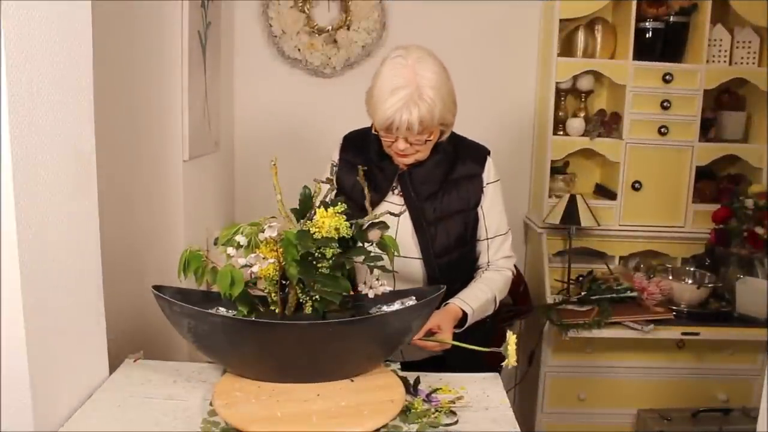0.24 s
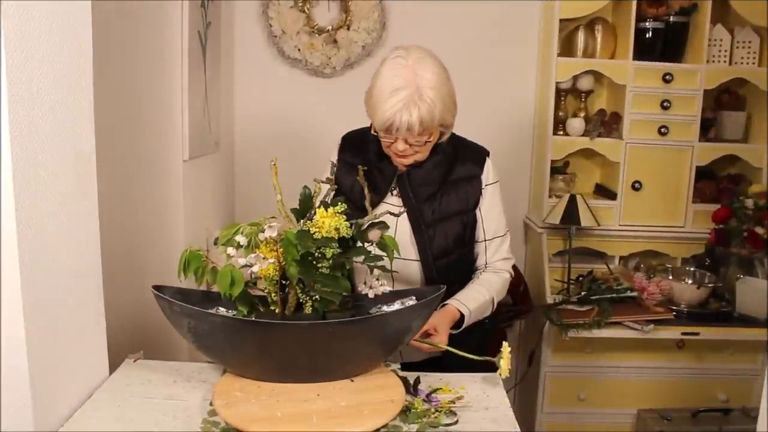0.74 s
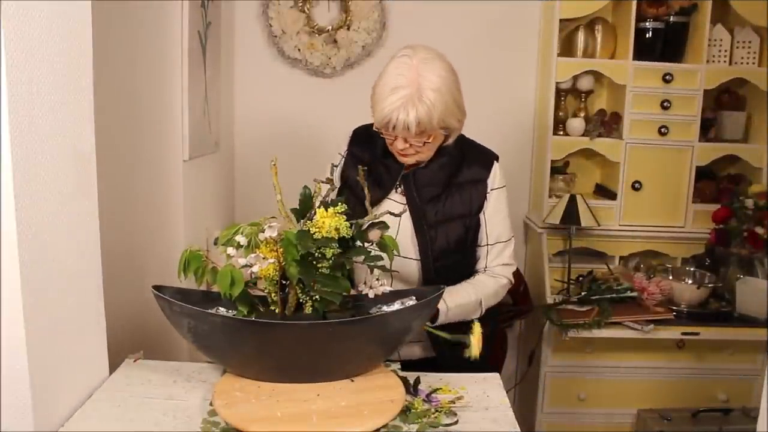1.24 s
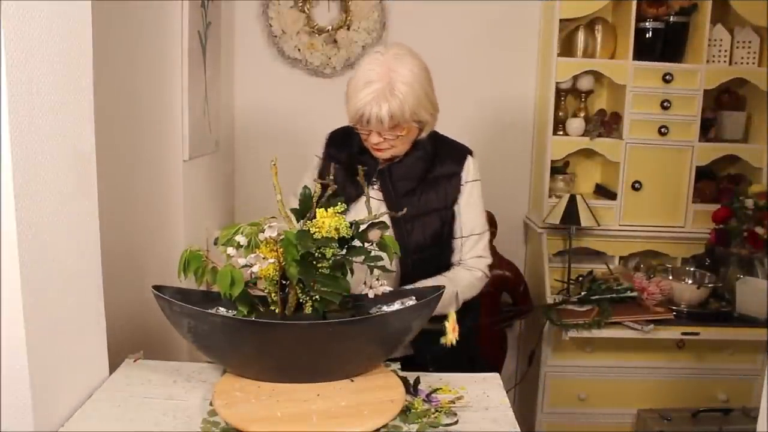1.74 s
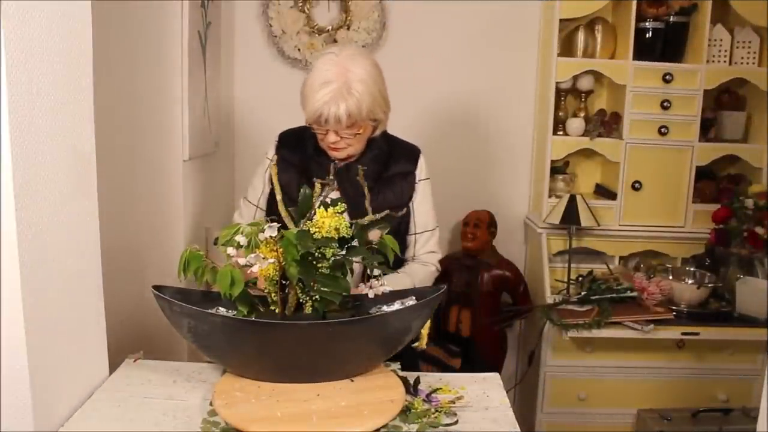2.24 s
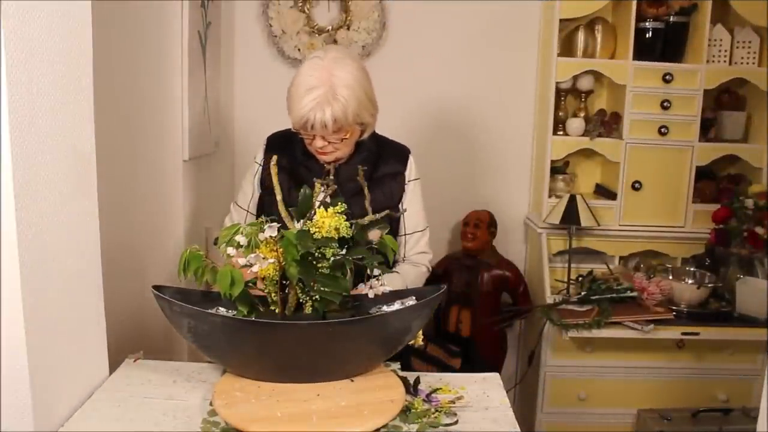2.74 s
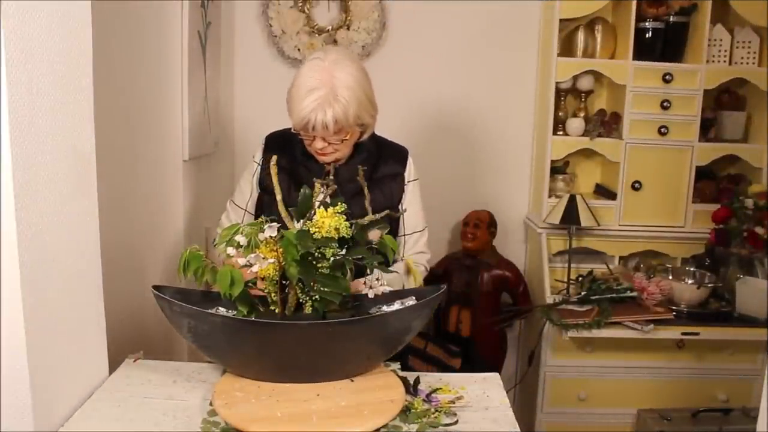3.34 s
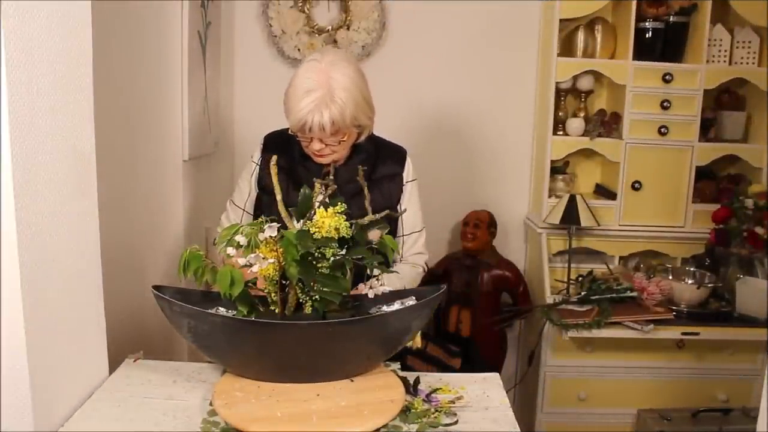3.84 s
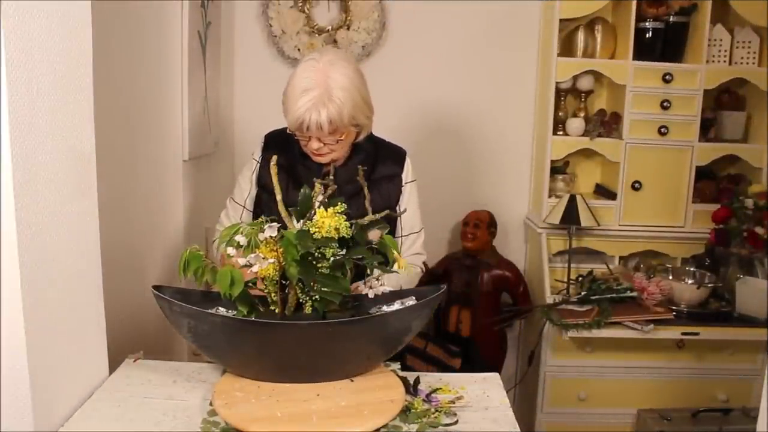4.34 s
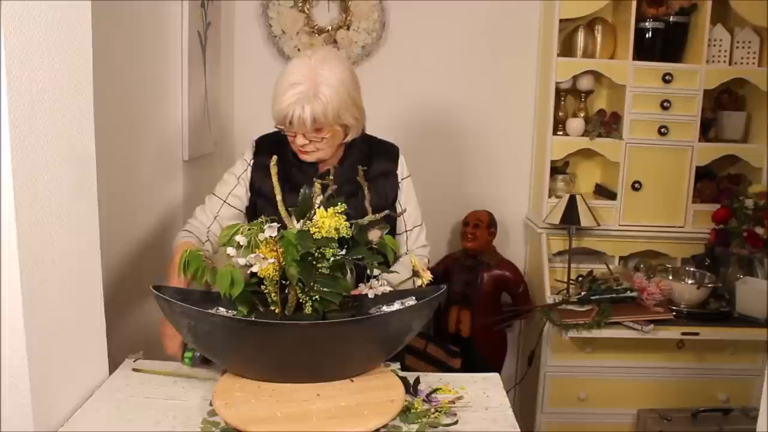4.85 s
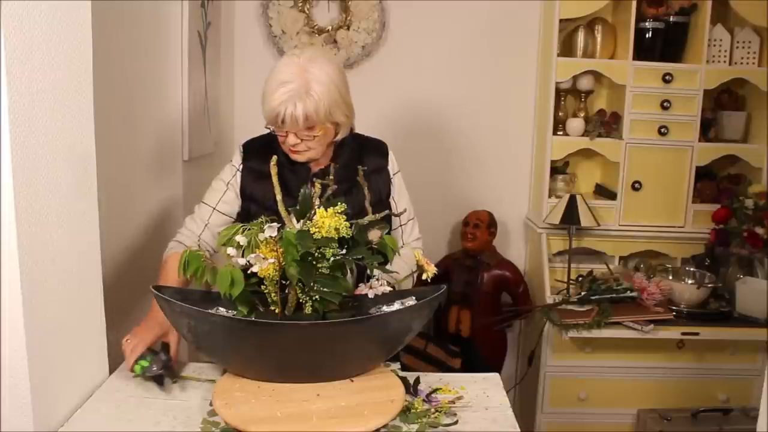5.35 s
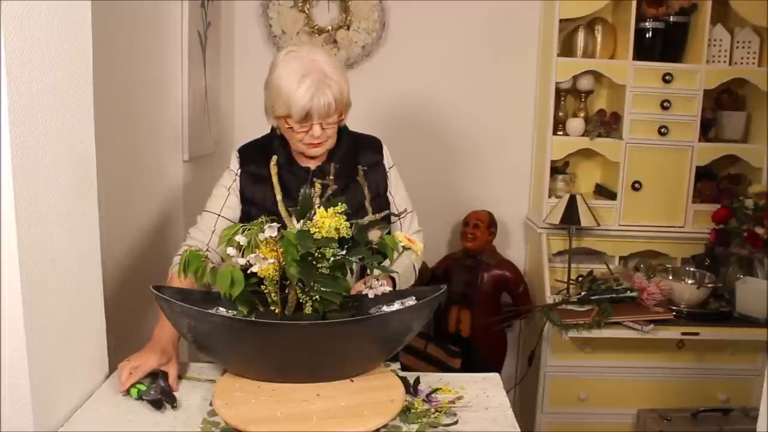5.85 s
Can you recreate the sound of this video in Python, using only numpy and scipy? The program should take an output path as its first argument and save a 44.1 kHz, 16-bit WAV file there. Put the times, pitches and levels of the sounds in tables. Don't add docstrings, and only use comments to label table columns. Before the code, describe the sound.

Secateurs snip two stems in a small room, leaves tick and rustle, then the tool knocks, bounces and lands hard on a wooden table.

```python
import sys
import numpy as np
from scipy import signal
from scipy.fft import rfft, irfft
from scipy.io import wavfile

SR = 44100
rng = np.random.default_rng(int(sys.argv[2]) if len(sys.argv) > 2 else 0)


def voltage_ratio(level):
    return 10 ** (np.asarray(level, float) / 20)


def digitize_waveform(pressure):
    field = np.atleast_2d(pressure).T
    bounded = np.clip(field, -1, 1)
    quanta = np.round(bounded * 32767).astype(np.int16)
    wavfile.write(sys.argv[1], SR, quanta)


N = 268128


def rms_one(x):
    return x / np.sqrt(np.mean(x ** 2) + 1e-20)


def at_hz(points, hz):
    table_hz, value = np.transpose(points)
    return np.interp(np.log(np.maximum(hz, 1)), np.log(table_hz), value)


def convolve(x, response):
    return signal.fftconvolve(x, response)[:len(x)]


def causal(shape_db, size=16384):
    hz = np.arange(size // 2 + 1) * SR / size
    cepstrum = irfft(shape_db(hz) * np.log(10) / 20)
    cepstrum[1:size // 2] *= 2
    cepstrum[size // 2 + 1:] = 0
    return irfft(np.exp(rfft(cepstrum)))[:size // 2]


def tinted(x, points):
    return convolve(x, causal(lambda hz: at_hz(points, hz)))


def burst(length_ms):
    size = 2048
    chance = rng.standard_normal(size)[::16] ** 2
    delay_s = length_ms / 1000 * np.repeat(chance, 16)[:size // 2 + 1]
    phase = -2 * np.pi * np.cumsum(delay_s) * SR / size
    return irfft(np.exp(1j * phase))[:size // 2]


def add(out, s, db, sound):
    at = round(s * SR)
    out[at:at + len(sound)] += (voltage_ratio(db) * sound / np.max(np.abs(sound)))[:N - at]


def modes(body, size=16384):
    t = np.arange(size) / SR
    return sum(voltage_ratio(db - 60 * t / t60) * np.sin(2 * np.pi * hz * t) for hz, db, t60 in body)


def snips():
    # start_s, level_db (peak), length_ms
    thick_cut = [
        (2.1206, -16, 1.0),
        (2.1281, -18, 1.0),
    ]
    thin_cut = [
        (4.2167, -24, 1.0),
        (4.2178, -17, 1.6),
        (4.2204, -18, 1.6),
        (4.2252, -23, 2.0),
    ]
    # pitch_hz, level_db (per Hz)
    thick_stem = [(180, -57), (300, -27), (366, -36), (418, -11), (502, 1), (656, -27), (762, -9),
                  (1190, -14), (2280, -2.5), (3030, 1), (3350, -7), (4750, -3), (16000, -37)]
    thin_stem = [(180, -54), (300, -19), (678, -14.5), (1170, -9), (1460, -7.5), (2000, -9), (2280, 0.5),
                 (2930, -3.5), (3700, -2.5), (5900, -4.5), (8220, -5.5), (13300, -8.5), (16000, -6)]
    # pitch_hz, level_db, t60_s
    blades = [(2310, -30, 0.15), (2380, -28, .16), (2470, -38, 0.15), (2540, -28, 0.13), (3090, -37, 0.023),
              (4700, -48, 0.045), (10500, -33, 0.007)]
    out = np.zeros(N)
    for cuts, stem in ((thick_cut, thick_stem), (thin_cut, thin_stem)):
        for s, db, length_ms in cuts:
            spray = np.pad(burst(length_ms), (0, 8192))
            crack = tinted(spray, stem)
            ring = convolve(spray, modes(blades))
            add(out, s, db, crack / np.max(np.abs(crack)) + ring)
    return out


def ticks(events, length_ms, shelf_db, per_octave_db=0):
    out = np.zeros(N)
    for s, db, centre_hz, octaves in events:
        def hump(hz):
            away = np.log2((hz + 1) / centre_hz)
            shelf = shelf_db + per_octave_db * octaves + 3.6 * np.minimum(away, 0)
            return np.maximum(-6 * (away / max(octaves, 0.1)) ** 2, shelf)
        colour = np.pad(causal(hump, size=2048), (0, 512))
        add(out, s, db - 0.5, convolve(colour, burst(length_ms)))
    return out


def catch():
    # start_s, level_db (peak), pitch_hz (centre), width_octaves
    clicks = [
        (0.369, -25, 5160, 0.28),
        (0.389, -25, 5370, 0.5),
        (4.7747, -37, 4570, 0.71),
        (4.7774, -21.5, 6150, 0.69),
        (4.7795, -24.5, 4800, 0.95),
        (5.929, -29, 11100, 0.93),
        (5.9302, -31, 4630, 0.59),
    ]
    return ticks(clicks, length_ms=1, shelf_db=-12.5, per_octave_db=3.4)


def handle():
    # start_s, level_db (peak), pitch_hz (centre), width_octaves
    strikes = [
        (4.9136, -19.5, 2630, 0.9),
        (5.0133, -28.5, 4800, 0.26),
        (6.0519, -26, 2560, 0.16),
        (6.0584, -38.5, 2410, 0.22),
    ]
    return ticks(strikes, length_ms=1.3, shelf_db=-36)


def plant_ticks():
    # start_s, level_db (peak), pitch_hz (centre), width_octaves
    crisp = [(0.2114, -29, 5700, 1), (0.2894, -42, 10200, 0.73), (0.3024, -53, 4990, 0.93),
             (0.3144, -37, 5200, 1), (0.3633, -27.5, 5400, 1), (0.3914, -44, 5000, 0.88),
             (0.3992, -29.5, 7500, 0.22), (0.6564, -31, 3900, 1), (1.0565, -39.5, 3260, 1),
             (1.3108, -33.5, 7060, 0.44), (1.374, -32.5, 5760, 0.36), (1.6232, -37.5, 4360, 0.27),
             (1.701, -34.5, 4060, 0.85), (2.4541, -34, 5300, 0.95), (2.6303, -36.5, 4620, 0.35),
             (2.9656, -41, 3900, 0.65), (4.6356, -35.5, 5070, 0.8), (4.7712, -32, 2220, 0.56)]
    return ticks(crisp, length_ms=0.58, shelf_db=-18.5, per_octave_db=8.6)


def brush():
    start_s, gap_s, level_db, swell_db = 3.893, 0.011, -33, 5
    ribs = [(start_s + gap_s * k, level_db - swell_db * (k - 2) ** 2, 10500, 0.7) for k in range(5)]
    return ticks(ribs, length_ms=4.5, shelf_db=-1)


def taps():
    # start_s, level_db (peak), pitch_hz (centre)
    dull = [(0.21, -47.5, 720), (0.369, -46, 720), (0.661, -47, 450), (2.028, -43, 367),
            (2.123, -36.5, 567), (2.416, -34, 1040), (2.454, -44.5, 352), (2.63, -37.5, 650),
            (2.968, -49.5, 880), (4.771, -35, 920), (5.016, -19.5, 694), (5.161, -61, 736),
            (5.859, -44.5, 1720), (5.731, -38.5, 613)]
    # start_s, level_db (peak)
    heel = [
        (2.419, -37.5),
        (5.044, -29),
        (5.759, -43.5),
        (5.849, -47),
        (6.052, -12.5),
    ]
    tap_octaves, hand_hz, hand_octaves = 0.65, 354, 0.34
    knuckles = ticks([(*row, tap_octaves) for row in dull], length_ms=1.6, shelf_db=-40)
    flesh = ticks([(*row, hand_hz, hand_octaves) for row in heel], length_ms=1.5, shelf_db=-61)
    return knuckles + flesh


def table(damping):
    mode_hz = [220, 301, 424, 500, 572, 632, 719, 782, 850, 963, 1063, 1355, 1658, 1943, 2480, 3100]
    # level_db, t60_s
    mode_ring = [(-20, .06), (-3, .2), (-10, .07), (-10, .06), (-7, .08), (-7, .09), (-6, .08), (2, .2),
                 (-6, .1), (-9, .08), (-5, .15), (-16, .08), (-20, .07), (-23, .06), (-24, .04), (-30, .03)]
    return [(hz, db, damping * t60) for hz, (db, t60) in zip(mode_hz, mode_ring)]


def blows(events, body):
    landing_db = 1.5
    out = np.zeros(N)
    sprays = [burst(length_ms) for *_, length_ms in events]
    shares = landing_db * rng.standard_normal((len(events), len(body)))
    for (s, db, tilt_db, _), spray, share in zip(events, sprays, shares):
        tilt = np.clip(tilt_db, -8, 4)
        struck = [(hz, level + tilt * np.log2(hz / 600) + change, t60)
                  for (hz, level, t60), change in zip(body, share)]
        add(out, s, db - 4.5, convolve(modes(struck), spray))
    return out


def knocks():
    # start_s, level_db (peak), tilt_db (per octave)
    single = [
        (2.416, -37, 4),
        (4.771, -40, -11),
        (4.875, -33, -11),
        (4.915, -7.5, 4),
        (4.935, -12.5, 0),
        (4.999, -19, -8),
        (5.162, -36.5, -1),
    ]
    # start_s, level_db (peak), tilt_db (per octave)
    edge_blows = [
        (5.7315, -31, -4),
        (5.999, -34, -4),
        (6.0512, 0, -3),
        (6.06, -5, -2),
        (6.067, -8, 0),
    ]
    # pitch_hz, level_db
    near_edge = [(220, -14), (301, 7), (424, 8.5), (500, -13), (632, 7.5), (782, 1), (1063, -3), (1658, 4)]
    # low and high limits, pitch_hz
    band_hz = [270, 3400]
    knock_ms = 1.25

    bounce_s, bounce_gap_s, bounce_db, bounce_loss_db = 5.0155, 0.0295, -14.5, 6.5
    bounces = [(bounce_s + bounce_gap_s * k, bounce_db - bounce_loss_db * k, -1) for k in range(5)]

    drag_s, drag_gap_s, drag_db, drag_spread_db = 5.76, 0.019, -44, -1.5
    drag = [(drag_s + drag_gap_s * (k + 0.156 * late), drag_db + drag_spread_db * hard, 2)
            for k, (late, hard) in enumerate(rng.standard_normal((10, 2)))]

    edge = [(hz, db + at_hz(near_edge, hz), t60) for hz, db, t60 in table(1)]
    middle_hits = blows([(*row, knock_ms) for row in single + bounces], table(0.8))
    edge_hits = blows([(*row, knock_ms) for row in edge_blows + drag], edge)
    radiates = signal.butter(3, band_hz, "band", fs=SR, output="sos")
    return signal.sosfilt(radiates, middle_hits + edge_hits)


def thump():
    # start_s, level_db (peak), tilt_db (per octave), length_ms
    steps = [
        (1.623, -22, 0.5, 2.79),
        (1.655, -26, -10, 2.4),
    ]
    # pitch_hz, level_db, t60_s
    boards = [(71, 25.5, 0.072), (120, 6, 0.074), (172, -1, 0.11), (215, 20, 0.041), (295, 1, 0.064),
              (387, -2, 0.061), (510, 11.5, 0.038), (700, -13, .06)]
    return blows(steps, boards)


def grains(per_s, spread_db):
    chance, size, side = rng.random((3, N))
    level = voltage_ratio(-spread_db * np.log(size + 0.012))
    return rms_one((chance < per_s / SR) * level * np.sign(side - 0.5))


def strokes(rows):
    rise_db_per_s, fall_db_per_s = 93, 116
    t = np.arange(N) / SR
    levels = [db - rise_db_per_s * np.maximum(s - t, 0) - fall_db_per_s * np.maximum(t - s - hold, 0)
              for s, hold, db in rows]
    return np.max(levels, axis=0)


def handling():
    # start_s, hold_s, level_db
    swishes = [(0.0, .1, -54.5), (.34, .06, -46), (1.15, .4, -48), (1.9, .5, -48.5), (3.8, .12, -58.5),
               (4.6, .26, -49), (5.0, .02, -37.5), (5.5, .4, -51)]
    crackles = [(.3, .1, -45), (1.02, 0.15, -52.5), (1.52, 0.035, -48), (2.28, 0.036, -48),
                (3.5, 0.41, -61), (4.8, .06, -53), (5.2, .1, -63)]
    slides = [(0.0, 0.23, -61.5), (1.0, .95, -57.5), (2.6, 0.092, -49), (3.5, .65, -61.5),
              (4.82, 0.029, -50), (5.18, .6, -57), (5.9, 0.015, -42)]
    # pitch_hz, level_db (per Hz)
    cloth_colour = [(150, -40.5), (400, -17.5), (1200, -2.5), (2500, -4), (5000, -11.5), (10000, -23.5),
                    (16000, -24)]
    leaf_colour = [(500, -5), (2000, -50), (5000, 5), (8000, 2.5), (12000, -1.5), (16000, -5)]
    cloth = rms_one(tinted(grains(6000, spread_db=8.0), cloth_colour))
    leaves = rms_one(tinted(grains(1500, spread_db=7.5), leaf_colour))
    stutter = rms_one(convolve(grains(400, spread_db=6.0), modes(table(0.075))))
    return (voltage_ratio(strokes(swishes) - 14.0) * cloth
            + voltage_ratio(strokes(crackles) - 15.0) * leaves
            + voltage_ratio(strokes(slides) - 13.0) * stutter)


def reflections():
    # pitch_hz, t60_s
    room_t60 = [(300, 0.36), (790, 0.38), (2090, 0.43), (5510, 0.32), (14600, 0.21)]
    onset_ms = 0.85
    t = np.arange(SR // 2 + 4096) / SR
    edges = 62.5 * 2.0 ** np.arange(9)
    tail = np.zeros(len(t))
    for low, high in zip(edges, edges[1:]):
        octave = signal.butter(2, [low, high], "band", fs=SR, output="sos")
        band = signal.sosfilt(octave, rng.standard_normal(len(t)))
        fall = voltage_ratio(-60 * t / at_hz(room_t60, np.sqrt(low * high)))
        tail += band * fall / np.sqrt(np.sum(fall ** 2))
    tail *= 1 - np.exp(-(1000 * t / onset_ms) ** 2)
    return tail / np.sqrt(np.sum(tail ** 2))


def room(sources):
    direct = sum(x for x, db in sources)
    sent = sum(voltage_ratio(db) * x for x, db in sources)
    return direct + convolve(sent, reflections())


def scene():
    wood = knocks() + thump()
    dull = taps()
    stems = snips() + plant_ticks() + brush() + handle() + dull + handling()
    return room([(stems, 3.0), (wood, -2), (catch(), -2.5)])[None]


def hiss():
    # pitch_hz, level_db (per Hz)
    colour = [(25, -46), (42, 7), (49, -6), (98, -10.5), (157, -9), (234, -5.5), (424, -3), (810, -2),
              (2480, -4.5), (4390, -7), (9980, -15), (14800, -13.5), (16000, -11)]
    settle = 4096
    noise = tinted(rng.standard_normal(N + settle), colour)[settle:]
    return voltage_ratio(-56.5) * rms_one(noise)


def treble_gaps(x):
    gaps = [(.492, 6800, -4), (1.09, 5000, -1), (1.452, 7040, -7), (1.615, 6500, 2), (1.728, 7040, -6),
            (2.178, 7760, -1), (3.14, 4500, -2.5), (4.652, 6500, 0), (4.716, 4530, -1), (4.80, 7400, 5),
            (5.001, 6850, -36), (5.057, 6850, -14)]
    gap_ms, gap_ms_per_db = 8.6, 1.23
    hole_db, hole_hz, hole_share, holes_below_hz = -13, 240, 0.55, 7800
    out, half = x.copy(), 2048
    t_ms = 1000 * np.arange(-half, half) / SR
    bins_hz = np.arange(half + 1) * SR / (2 * half) + 1
    for s, hz, depth_db in gaps:
        at = round(s * SR)
        part = slice(at - half, at + half)
        empty = rng.random(128)[(bins_hz / hole_hz).astype(int)] < hole_share
        holes = empty * (bins_hz > 4 * hole_hz) * (hz < holes_below_hz)
        dip = 1 - (1 - voltage_ratio(depth_db)) / (1 + (hz / bins_hz) ** 16)
        kept = dip * voltage_ratio(hole_db * holes)
        length_ms = gap_ms - gap_ms_per_db * depth_db
        window = np.exp(-(2 * t_ms / length_ms) ** 6)
        out[:, part] -= irfft(rfft(x[:, part]) * (1 - kept)) * window
    return out


def band_limit(x):
    return signal.sosfilt(signal.butter(12, 16490, fs=SR, output="sos"), x)


def record(dry):
    bass_cut_hz, top_cut_hz, offset = 193, 16250, 0.00051
    thin = signal.sosfilt(signal.butter(4, bass_cut_hz, "high", fs=SR, output="sos"), dry)
    loud = thin + hiss() + offset
    held = loud / (1 + (2 * loud) ** 8) ** 0.125
    cut = signal.sosfilt(signal.cheby2(14, 60, top_cut_hz, fs=SR, output="sos"), held)
    finished = treble_gaps(cut)
    return band_limit(finished)


dry = scene()
out = record(dry)
digitize_waveform(out)
```